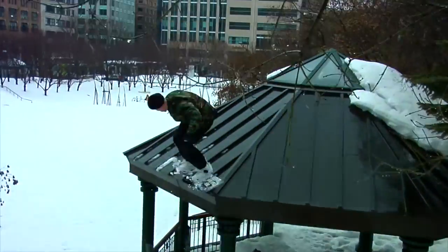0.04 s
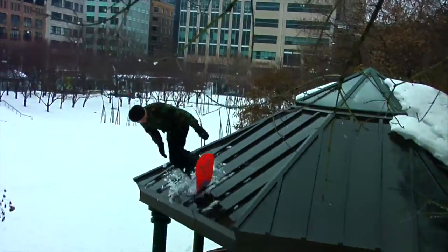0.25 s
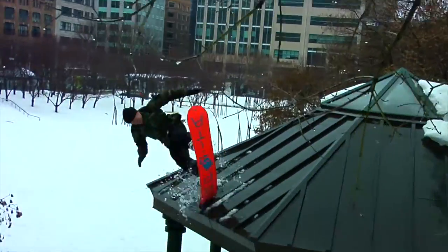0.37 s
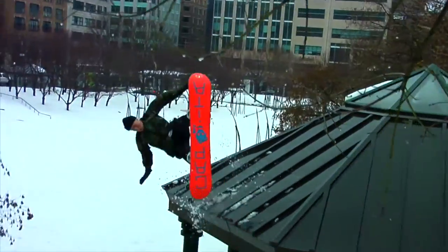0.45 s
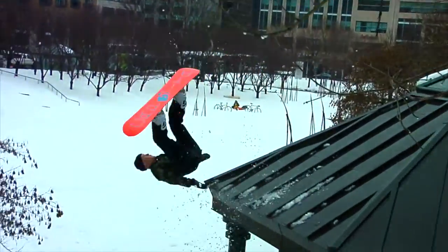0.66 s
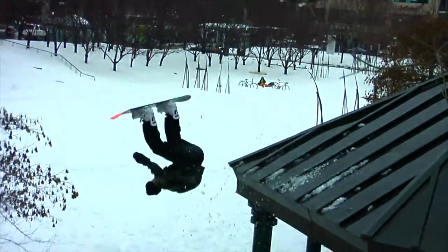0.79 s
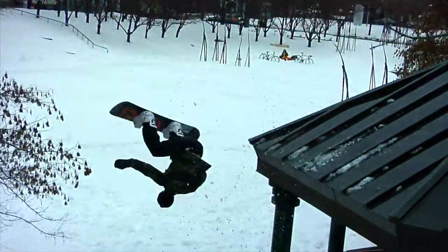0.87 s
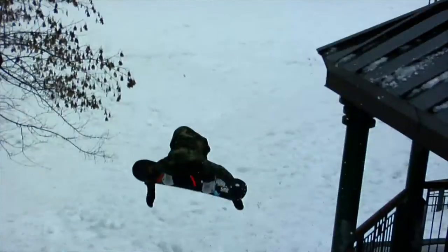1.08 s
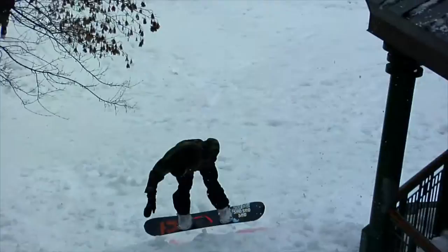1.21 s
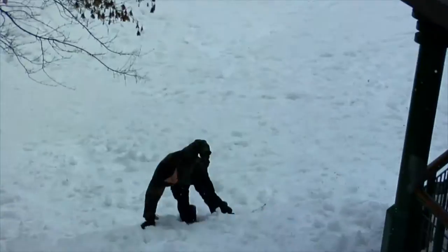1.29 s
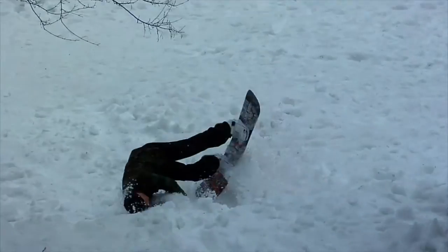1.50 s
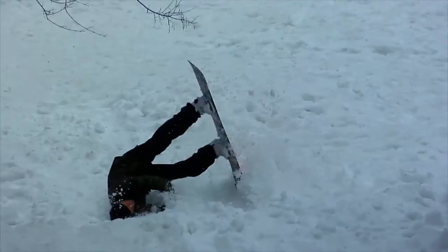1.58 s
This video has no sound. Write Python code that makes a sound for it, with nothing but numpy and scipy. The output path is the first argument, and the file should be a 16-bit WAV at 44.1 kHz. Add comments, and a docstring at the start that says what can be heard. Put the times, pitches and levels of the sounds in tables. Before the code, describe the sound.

A snowboard slams onto a sheet-metal roof, scrapes across it and cracks off the edge. After a brief pause, the rider thumps into deep snow with a crunch. Light wind and a distant city hum lie underneath.

```python
"""A snowboard slams onto a sheet-metal roof, knocks again, scrapes over it and cracks off the eave.
Each impact excites the damped modes of board and roof, and the freed board rings briefly.
Loose snow patters down as the rider flies, then thumps into deep snow and tumbles on with a crunch,
a dense train of tiny fractures. Wind and a low, distant city hum fill the park,
whose surroundings return two faint echoes."""
import sys
import numpy as np
from scipy import signal
from scipy.fft import rfft, irfft
from scipy.io import wavfile

SR = 44100
rng = np.random.default_rng(int(sys.argv[2]) if len(sys.argv) > 2 else 0)


def generate_wav(signal):
    """Clip the signal to [-1, 1] and save it as 16-bit WAV at the path in sys.argv[1]."""
    frames = np.transpose(np.atleast_2d(signal))
    scaled = np.clip(frames, -1, 1) * 32767
    pcm = np.round(scaled).astype(np.int16)
    wavfile.write(sys.argv[1], SR, pcm)


N = 72765
TIME = np.arange(N) / SR


def from_db(db):
    """Decibels to amplitude ratio."""
    return 10 ** (np.asarray(db) / 20)


def rms_one(x):
    """Normalisation to unit rms."""
    return x / np.sqrt(np.mean(x ** 2) + 1e-20)


def level(points):
    """Gain interpolated along a (time_s, level_db) curve."""
    return from_db(np.interp(TIME, *np.transpose(points)))


def cut(x, hz, kind, order=2):
    """Butterworth low- or high-pass filtering."""
    sos = signal.butter(order, np.clip(hz, 10, SR * .45), kind, fs=SR, output="sos")
    return signal.sosfilt(sos, x + 1e-18)


def coloured(x, spectrum):
    """Spectral shaping by a (frequency_hz, gain_db) curve, to unit rms."""
    hz, db = np.transpose(spectrum)
    bins = np.maximum(np.fft.rfftfreq(N, 1 / SR), 1)
    gain = from_db(np.interp(np.log(bins), np.log(hz), db))
    return rms_one(irfft(rfft(x) * gain, N))


def grains(per_s, spread_db):
    """Shot noise: random impulses of uneven size."""
    sizes = from_db(spread_db * np.minimum(rng.exponential(1, N), 5))
    return sizes * rng.choice([-1, 1], N) * (rng.random(N) < per_s / SR)


def envelope(start_s, attack_s, t60_s, hold_s=0):
    """Linear rise, hold, exponential decay."""
    age = TIME - start_s
    decay = np.exp(-np.log(1000) * np.maximum(age - attack_s - hold_s, 0) / t60_s)
    return np.clip(age / attack_s, 0, 1) * decay


def click(start_s):
    """A unit impulse."""
    return np.maximum(1 - abs(TIME - start_s) * SR, 0)


def ring(force, modes):
    """Modal superposition: one force drives damped resonators in parallel."""
    out = 0
    for hz, db, t60_s in modes:
        radius, angle = np.exp(-np.log(1000) / (t60_s * SR)), 2 * np.pi * hz / SR
        feedback = [1, -2 * radius * np.cos(angle), radius * radius]
        out = out + from_db(db) * signal.lfilter([.5, 0, -.5], feedback, force + 1e-18)
    return out


def resonance(x, hz, width_hz):
    """Second-order band-pass filtering."""
    return signal.lfilter(*signal.iirpeak(hz, hz / width_hz, fs=SR), x)


# Spectra of the wind and city rumble and of the far wind hiss: frequency_hz, gain_db
RUMBLE_SPECTRUM = [(13, -63), (22, -14), (91, -9.5), (124, -5.5), (211, -8), (282, -9.5), (306, -16),
                   (481, -12.5), (567, -13.5), (616, -17), (804, -18.5), (3000, -33), (3900, -74),
                   (6600, -120)]
HISS_SPECTRUM = [(1000, -9), (2800, -3), (4200, -4), (7000, -13.5), (10000, -19.5), (16000, -28.5)]
# Envelopes of rumble, hiss and city hum: time_s, level_db
RUMBLE_ENVELOPE = [(0, -36.5), (.75, -36.5), (1.05, -37), (1.65, -37.5)]
HISS_ENVELOPE = [(0, -52), (.62, -55.5), (.76, -49.5), (.95, -52.5), (1.07, -52.5), (1.25, -55),
                 (1.65, -48.5)]
HUM_ENVELOPE = [(0, -47), (.5, -35), (.78, -44.5), (1.05, -44), (1.65, -47.5)]


def wind_and_city(hum_hz=120.82, half_width_hz=3.83):
    """Broadband noise rumbles and hisses; narrowband noise beats with itself as a wavering hum."""
    detuning = (np.fft.rfftfreq(N, 1 / SR) - hum_hz) / half_width_hz
    hum = rms_one(irfft(rfft(rng.standard_normal(N)) / (1 + detuning ** 2), N))
    rumble = cut(coloured(rng.standard_normal(N), RUMBLE_SPECTRUM), 2170, "low")
    hiss = coloured(rng.standard_normal(N), HISS_SPECTRUM)
    return level(RUMBLE_ENVELOPE) * rumble + level(HISS_ENVELOPE) * hiss + level(HUM_ENVELOPE) * hum


# Spectrum of breaking snow: frequency_hz, gain_db
SNOW_SPECTRUM = [(200, 5), (600, 2), (1400, -3), (2300, -6), (3200, -2.5), (4500, -7), (7000, -6),
                 (10000, -9.5), (13000, -18), (16000, -27.5)]


def breaking_snow():
    """Many tiny fractures add up to shot noise."""
    return coloured(grains(per_s=5000, spread_db=2), SNOW_SPECTRUM)


# Packed snow giving way: start_s, level_db, t60_s, lowpass_hz
CRUNCH_BURSTS = [(0.121, -45.5, 0.015, 12000), (1.315, -31.5, 0.0657, 12500), (1.324, -35, 0.094, 8900),
                 (1.414, -31, 0.027, 2800), (1.465, -36, 0.032, 16000), (1.511, -37, 0.066, 4500)]


def crunches(attack_s=0.00497):
    """Brittle fracture: the crust breaks in short bursts, some duller than others."""
    crust = breaking_snow()
    return sum(from_db(db) * envelope(start_s, attack_s, t60_s) * cut(crust, lowpass_hz, "low")
               for start_s, db, t60_s, lowpass_hz in CRUNCH_BURSTS)


# Envelope of the base scraping snow off the roof: time_s, level_db
SCRAPE_ENVELOPE = [(.2, -91.5), (.222, -59), (.236, -33.5), (.25, -30), (.29, -47), (.385, -52),
                   (.425, -40.5), (.452, -30), (.478, -31), (.495, -39), (.522, -32), (.57, -43.5),
                   (.68, -54), (.95, -93.5)]
# Spectrum of the grinding: frequency_hz, gain_db
SCRAPE_SPECTRUM = [(300, -8.5), (1000, 0.5), (2400, -1.5), (3300, 0.5), (4200, 1), (7000, -1), (10000, -9),
                   (13000, -13.5), (16000, -31)]


def scrape():
    """Friction grinds ice between base and metal and excites a resonance of the steel edge."""
    grinding = coloured(grains(per_s=16000, spread_db=2.36), SCRAPE_SPECTRUM)
    rasp = from_db(0.5) * resonance(grinding, hz=3295, width_hz=200)
    return level(SCRAPE_ENVELOPE) * rms_one(grinding + rasp)


# Board striking roof: start_s, force_db, lowpass_hz, highpass_hz, crack_db
CONTACTS = [(0.241, -14.5, 2500, 556, -13.5), (0.2431, 2, 6150, 2044, -12),
            (0.2443, -0.39, 1376, 130.4, -8.5), (.2490, -12, 2900, 230, -20), (0.251, -11, 2680, 199, -32),
            (0.2561, -30.5, 4900, 310, -18.5), (0.4061, -9.5, 1866, 1290, -28),
            (.4080, -6, 530, 109.4, -28.5), (0.5051, 3.5, 674, 344.6, -7.5), (.5080, -9, 2900, 860, -13.5)]
# Modes of board and roof in contact: pitch_hz, gain_db, t60_s
CONTACT_MODES = [(259, -14, .04), (453, -2, .02), (543, -9, .027), (690, -12, .022), (790, -16, .022),
                 (885, -12, .026), (1013, -20, .024), (1312, -25, .038), (1650, -18.5, .019),
                 (1920, -16.5, .013), (2420, -8, .015), (2856, -11.5, .034), (3360, -19, .03)]
# Spectrum of the icy crack: frequency_hz, gain_db
CRACK_SPECTRUM = [(300, 5), (1000, -16.5), (3000, 7), (4500, -2), (7000, -1.5), (12000, -9), (16000, -25.5)]


def knocks():
    """Impact excitation: each force pulse rings board and roof, along with a short icy crack."""
    force = cracks = 0
    for start_s, force_db, lowpass_hz, highpass_hz, crack_db in CONTACTS:
        pulse = cut(click(start_s), lowpass_hz, "low", order=1)
        force += from_db(force_db) * cut(pulse, highpass_hz, "high")
        cracks += from_db(crack_db) * envelope(start_s, attack_s=0.00059, t60_s=0.00757)
    return ring(force, CONTACT_MODES) + cracks * coloured(rng.standard_normal(N), CRACK_SPECTRUM)


# Panel vibration after each hit: start_s, level_db, t60_s
PANEL_SHUDDERS = [(0.242, -18.5, 0.3747), (0.407, -30, 0.372), (0.507, -30.5, 0.386)]
# Spectrum of the panels: frequency_hz, gain_db
PANEL_SPECTRUM = [(100, -8.5), (250, -2.5), (430, 3), (850, -3), (1300, -10.5), (2000, -12.5), (2800, -11),
                  (4200, -17), (7000, -24.5), (12000, -38.5), (16000, -50.5)]


def roof_shudder(attack_s=0.00166, clatter_db=7.5):
    """Modal overlap: dense panel modes merge into noise that clatters, then dies away."""
    fade = 0
    for start_s, db, t60_s in PANEL_SHUDDERS:
        clatter = from_db(clatter_db) * envelope(start_s, attack_s, t60_s=0.0296)
        fade += from_db(db) * (clatter + envelope(start_s, attack_s, t60_s))
    return fade * coloured(rng.standard_normal(N), PANEL_SPECTRUM)


# Modes of the beams under the panels: pitch_hz, gain_db, t60_s
FRAME_MODES = [(138, -44, 0.043), (193.5, -26, 0.33), (238.6, -29, 0.079), (271.3, -14.5, 0.0597)]


def beam_boom():
    """Impulse response of the roof frame as the rider's full weight first hits it."""
    return ring(click(start_s=.2445), FRAME_MODES)


# Envelope of the falling snow: time_s, level_db
PATTER_ENVELOPE = [(.5, -94.5), (.6, -72.5), (.8, -64.5), (.97, -75.5), (1.05, -64), (1.14, -64),
                   (1.3, -77)]
# Spectrum of its ticks: frequency_hz, gain_db
PATTER_SPECTRUM = [(2000, -18), (6000, 2), (10500, 0.5), (13000, -1.5), (16000, -14)]


def patter():
    """Ice crystals thrown off the roof land independently, making faint, bright shot noise."""
    return level(PATTER_ENVELOPE) * coloured(grains(per_s=1600, spread_db=5.5), PATTER_SPECTRUM)


# Modes of the airborne board: pitch_hz, gain_db, t60_s
FREE_BOARD_MODES = [(409, -10, .087), (720, -27, .06), (1168, -28, .08)]


def board_ring(free_s=.5135, swell_s=0.0028):
    """Free vibration: clear of the eave, the board rings with a hollow note."""
    return ring(click(free_s), FREE_BOARD_MODES) * np.clip((TIME - free_s) / swell_s, 0, 1)


# Board and body striking snow: start_s, force_db, lowpass_hz
LANDING_BLOWS = [(1.3173, -18.5, 192), (1.3207, -5.5, 371), (1.3262, -23.5, 1100), (1.3333, -19.5, 700)]
# Modes of the thump: pitch_hz, gain_db, t60_s
LANDING_MODES = [(118, -7, .05), (195, -2, .036), (250, -9, .028), (430, -13, .06), (620, -15, .025),
                 (820, -15, .02)]


def landing():
    """Soft impacts excite low, heavily damped modes; snow then fractures under the tumbling rider."""
    force = sum(from_db(db) * cut(click(start_s), lowpass_hz, "low")
                for start_s, db, lowpass_hz in LANDING_BLOWS)
    thump = ring(cut(force, 142.7, "high"), LANDING_MODES)
    slide = from_db(-39.5) * envelope(start_s=1.3202, attack_s=0.032, t60_s=1, hold_s=0.055)
    return thump + slide * breaking_snow()


# Reflections off the park's surroundings: delay_s, gain_db
REFLECTIONS = [(.105, -20), (.21, -22.5)]


def echoes(x, low_hz=1040, high_hz=1260):
    """Reflection returns faint, delayed copies of a narrow band of the sound."""
    thin = cut(cut(x, high_hz, "low", order=4), low_hz, "high", order=4)
    return sum(from_db(db) * np.interp(TIME - delay_s, TIME, thin, left=0) for delay_s, db in REFLECTIONS)


def scene():
    """Superposition of the ride, its echoes and the park, in mono."""
    roof = knocks() + beam_boom() + roof_shudder()
    ride = roof + board_ring() + scrape() + landing() + crunches()
    return (ride + echoes(ride) + wind_and_city() + patter())[None]


# Notches of the microphone housing: frequency_hz, gain_db, width_hz
HOUSING_NOTCHES = [(4020, -5, 1350), (5344, -5.5, 590), (8722, -7, 1580), (11180, -5.5, 780),
                   (13600, -5, 2050), (15630, -8.5, 1350)]


def record(dry, cutoff_hz=15900):
    """The housing notches the treble, soft saturation rounds the peaks and a low-pass cuts the top."""
    for hz, db, width_hz in HOUSING_NOTCHES:
        dry = dry + (from_db(db) - 1) * resonance(dry, hz, width_hz)
    lowpass = signal.ellip(10, .1, 80, cutoff_hz, fs=SR, output="sos")
    return signal.sosfilt(lowpass, np.tanh(dry))


dry = scene()
out = record(dry)
generate_wav(out)
```